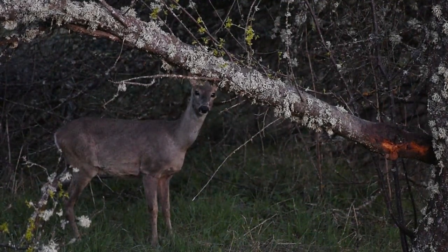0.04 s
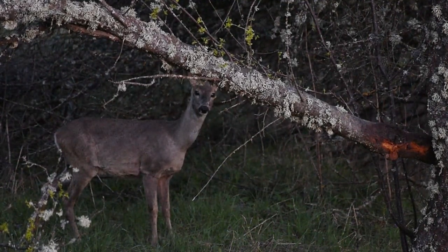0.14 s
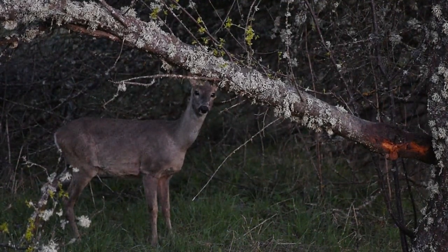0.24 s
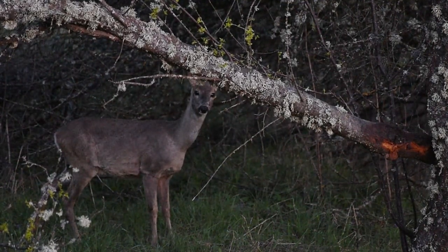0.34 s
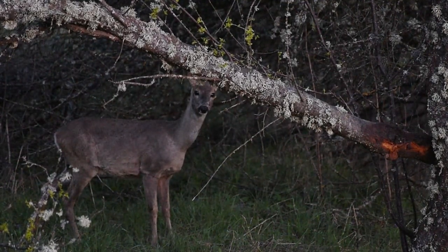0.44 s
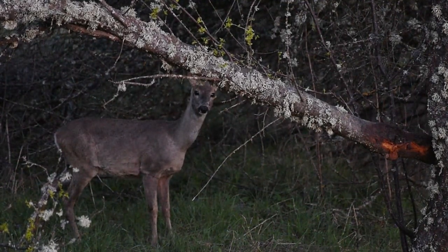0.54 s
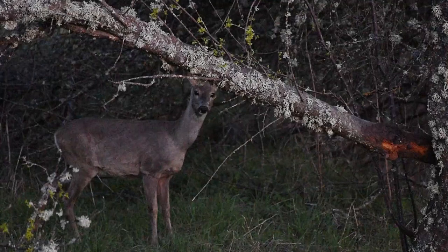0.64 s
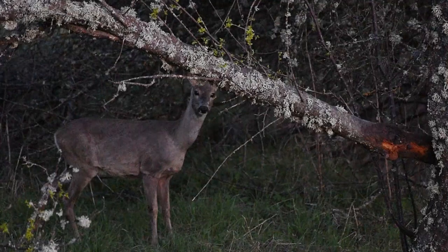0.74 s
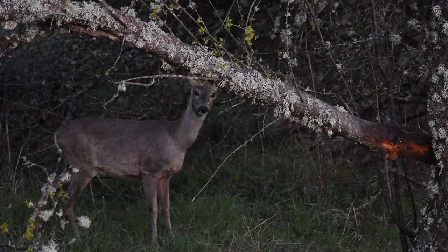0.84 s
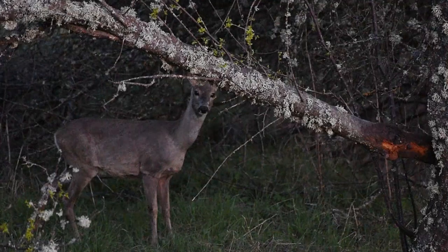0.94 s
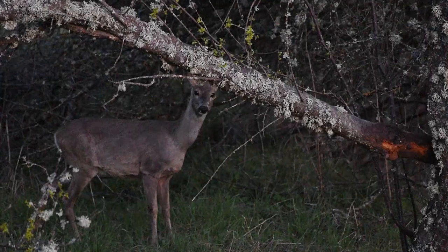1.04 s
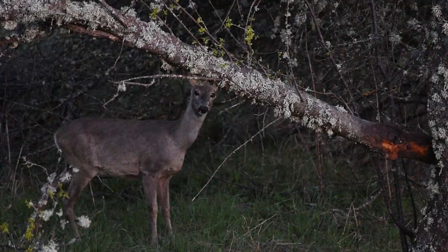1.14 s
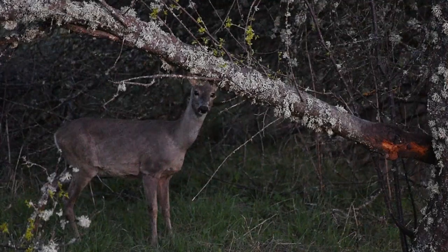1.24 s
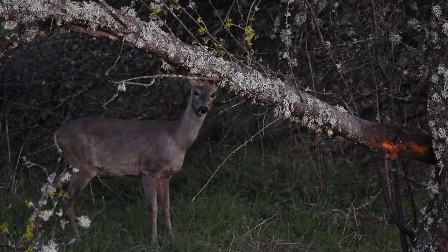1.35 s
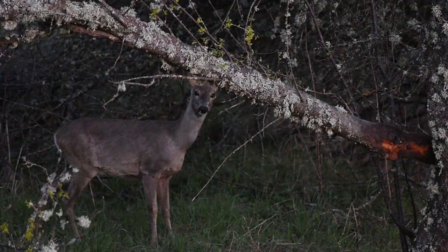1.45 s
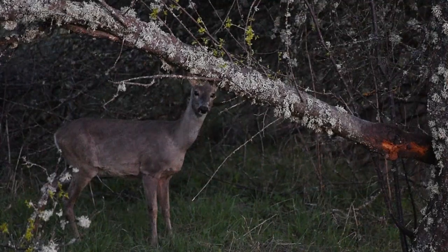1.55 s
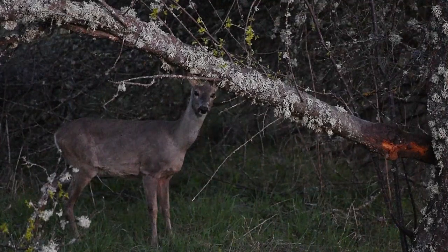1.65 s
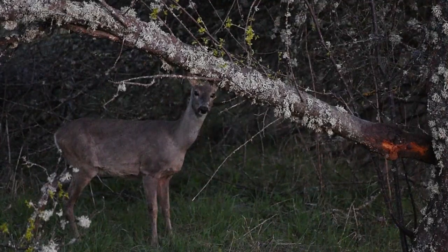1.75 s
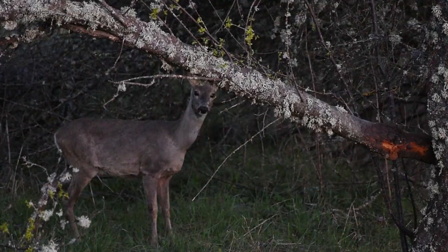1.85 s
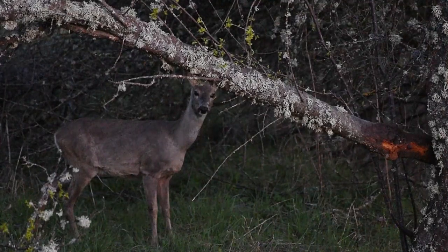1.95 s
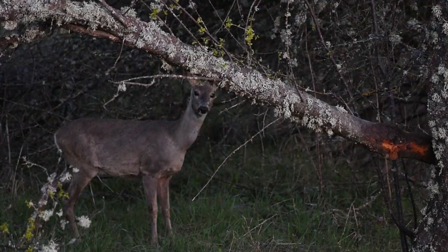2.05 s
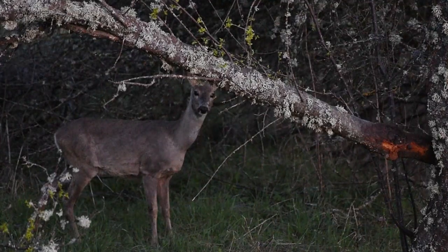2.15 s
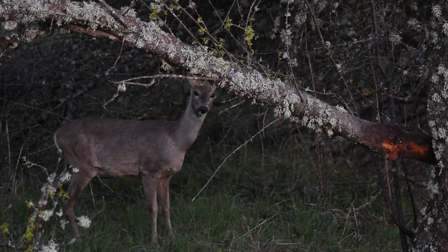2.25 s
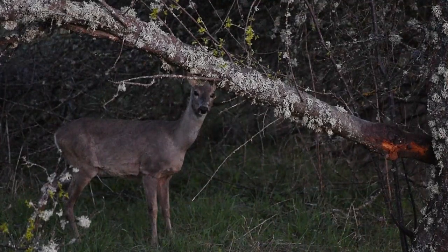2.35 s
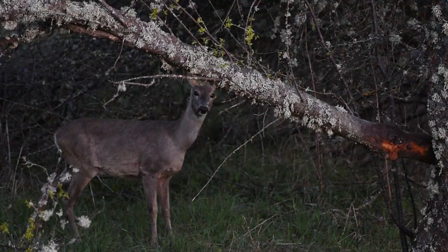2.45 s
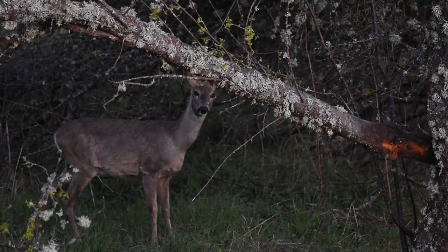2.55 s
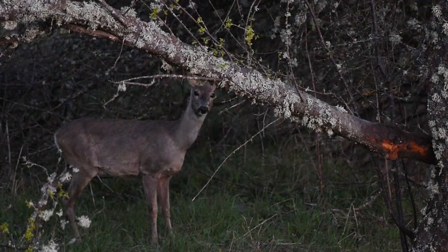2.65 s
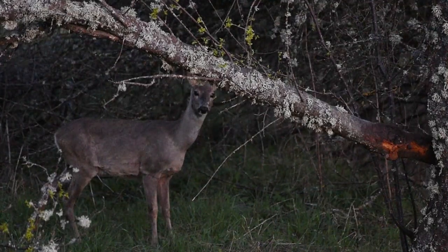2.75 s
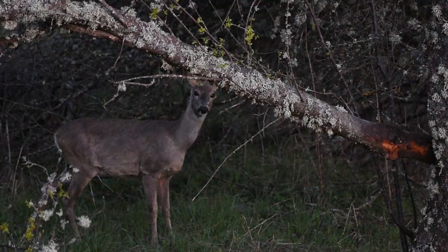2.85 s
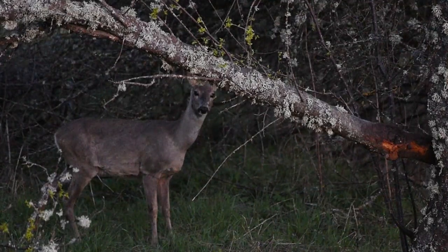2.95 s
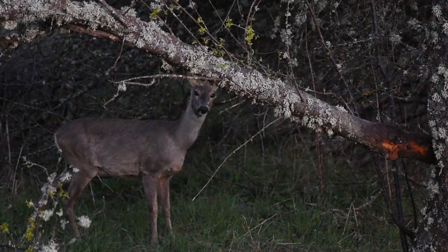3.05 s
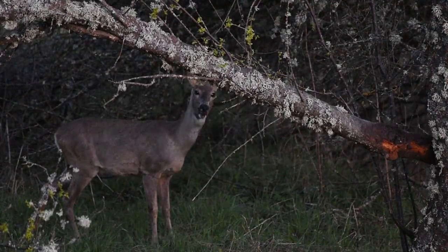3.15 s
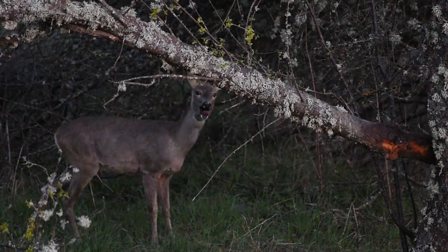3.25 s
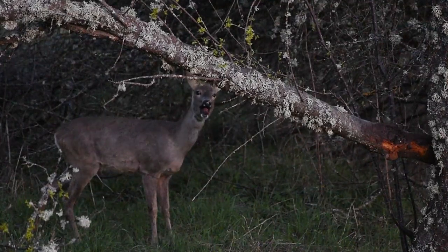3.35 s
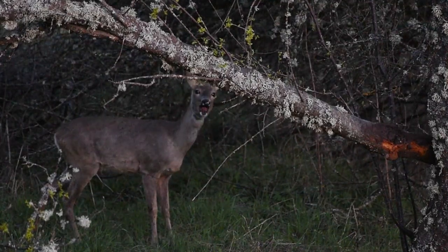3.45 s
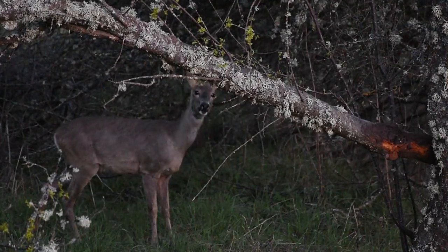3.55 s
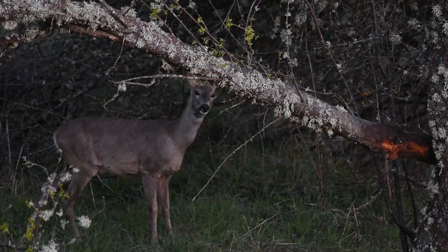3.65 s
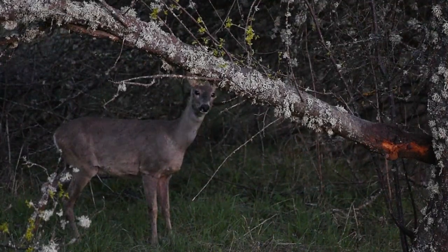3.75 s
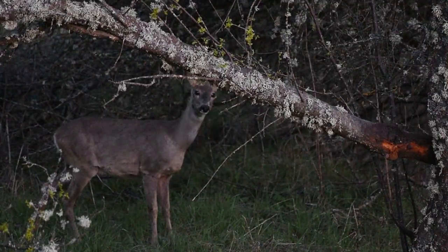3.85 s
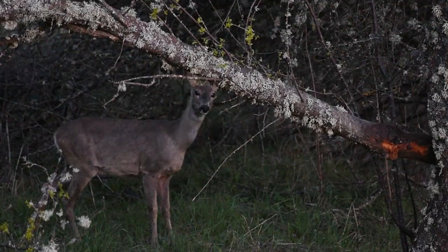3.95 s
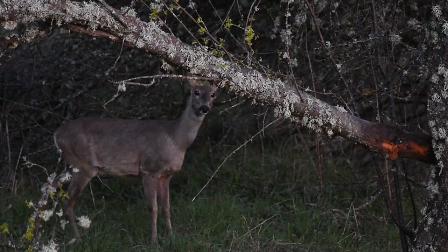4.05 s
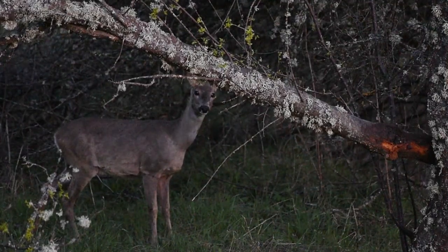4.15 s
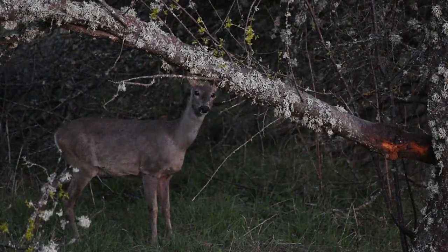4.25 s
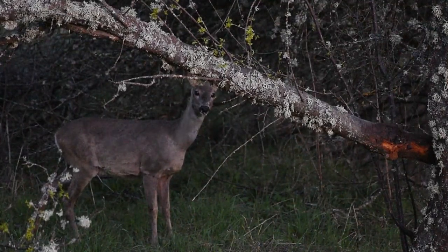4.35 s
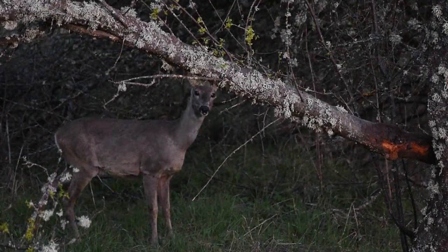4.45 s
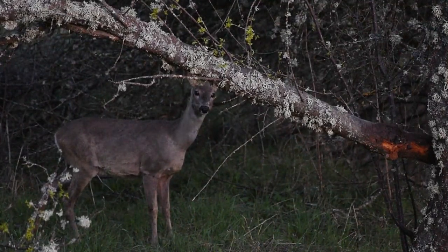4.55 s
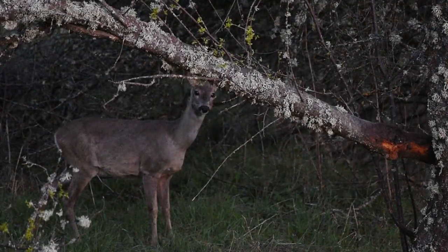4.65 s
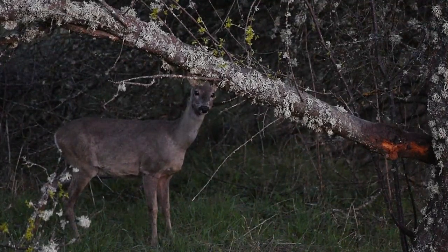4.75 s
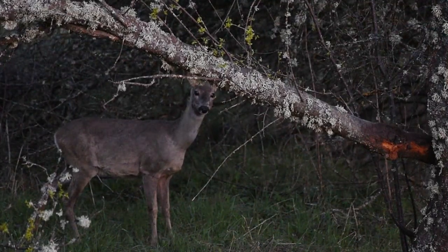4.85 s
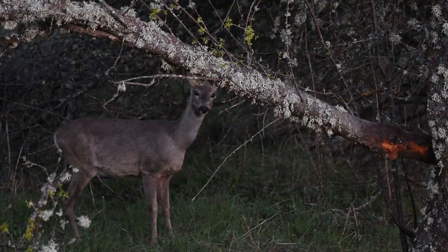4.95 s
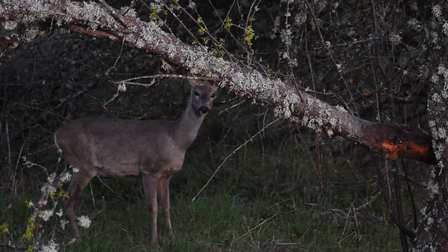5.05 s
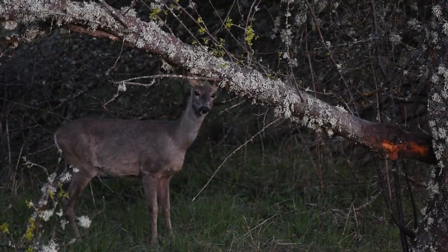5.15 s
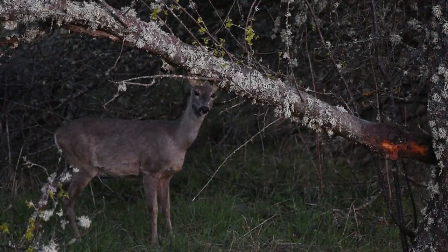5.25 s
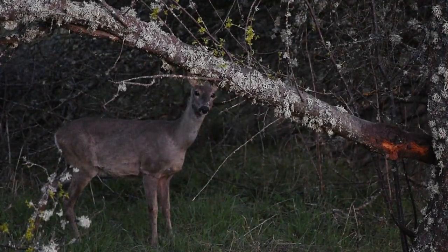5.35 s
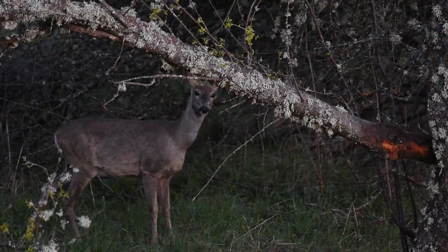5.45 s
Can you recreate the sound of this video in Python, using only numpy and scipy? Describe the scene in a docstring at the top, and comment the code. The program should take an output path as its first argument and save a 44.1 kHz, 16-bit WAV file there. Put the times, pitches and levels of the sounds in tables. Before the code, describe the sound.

In a hushed wood, a songbird whistles a short low fluted phrase while a camera lens motor whirs faintly and soft bumps touch its housing close to the microphone. Fainter bird calls follow. Midway a roe deer gives one loud, hoarse, rasping bark, echoing from the trees for about a second. A brief swish and thin hissing rustle come after, then a distant buzzy chirp and a puff of air.

```python
"""A songbird whistles a short phrase over the quiet hush of a wood: arcs of nearly pure tone, some buzzed.
Close by, a camera's lens motor whirs in short bursts of resonant noise; filtered-noise thuds bump its housing.
Soft noise brushes pass, air puffs swell the rumble, and faint bird calls come from deeper in the wood.
Then a roe deer gives one hoarse bark: rough fold pulses and breath noise drive throat and mouth resonances.
Random echoes from the trees carry it on for about a second; a noise swish and thin hiss rustle after it."""
import sys
import numpy as np
from scipy import signal
from scipy.fft import rfft, irfft
from scipy.io import wavfile
from scipy.ndimage import uniform_filter1d

SR = 44100
rng = np.random.default_rng(int(sys.argv[2]) if len(sys.argv) > 2 else 0)


def inscribe(sig):
    """Save sig as 16-bit PCM at rate SR to the path in sys.argv[1].

    A 1-D sig is mono; a 2-D sig holds one channel per row.
    Samples are clipped to [-1, 1] before scaling.
    """
    pcm = np.round(np.clip(np.atleast_2d(sig).T, -1, 1) * 32767)
    wavfile.write(sys.argv[1], SR, pcm.astype(np.int16))


N = 242991
TIME = np.arange(N) / SR   # seconds


def from_db(db):
    """Decibels to amplitude gain."""
    return 10 ** (np.asarray(db) / 20)


def rms_one(x):
    """Scale to rms 1."""
    return x / np.sqrt(np.mean(x ** 2) + 1e-20)


def in_time(rows):
    """Read each column of a breakpoint curve at every sample."""
    s, *columns = np.transpose(rows)
    return [np.interp(TIME, s, c) for c in columns]


def since(s):
    """Seconds gone by since a moment, 0 before it."""
    return np.maximum(TIME - s, 0)


def during(start, end, fade):
    """Gate of 1 between two moments, with linear ramps inside."""
    return np.clip(np.minimum(TIME - start, end - TIME) / fade, 0, 1)


def hump(s, width):
    """Bell-shaped swell of height 1."""
    return np.exp(-.5 * np.minimum(((TIME - s) / width) ** 2, 100))


def later(x, delay):
    """The same sound, so many seconds on."""
    return np.interp(TIME - delay, TIME, x)


def at_hz(points, hz):
    """Read a curve on a log-frequency axis."""
    points = np.array(points)
    return np.interp(np.log(hz + 1e-3), np.log(points[:, 0]), points[:, 1])


def coloured(x, spectrum):
    """Causal (minimum-phase) filter with the given spectrum, made by folding its cepstrum."""
    size = 8192
    level_db = at_hz(spectrum, np.arange(size // 2 + 1) * SR / size)
    cepstrum = irfft(np.log(from_db(level_db)))
    cepstrum[1:size // 2] *= 2
    cepstrum[size // 2 + 1:] = 0
    impulse = irfft(np.exp(rfft(cepstrum)))
    return signal.oaconvolve(x, impulse)[:N]


def band(x, low_hz, high_hz, order=2):
    """Butterworth band-pass."""
    edges = [low_hz, min(high_hz, .45 * SR)]
    sos = signal.butter(order, edges, "band", fs=SR, output="sos")
    return signal.sosfilt(sos, x + 1e-18)


def resonate(x, hz, width_hz):
    """One two-pole resonance, gain about 1 on top."""
    r = np.exp(-np.pi * width_hz / SR)
    feedback = [1, -2 * r * np.cos(2 * np.pi * hz / SR), r * r]
    return signal.lfilter([(1 - r * r) / 2, 0, (r * r - 1) / 2], feedback, x + 1e-18)


def glide(x, hz, width_hz):
    """Steep moving resonance: shift its centre to 0 Hz, low-pass, shift back."""
    turn = np.exp(2j * np.pi * np.cumsum(hz) / SR)
    sos = signal.butter(2, width_hz / 2, fs=SR, output="sos")
    return 2 * np.real(turn * signal.sosfilt(sos, x / turn))


def drift(rate):
    """Random curve of rms 1, joining this many random points a second."""
    return rms_one(np.interp(TIME * rate, np.arange(8192), rng.standard_normal(8192)))


def evened(x, window_s):
    """Hold the running level near 1 while keeping the single pulses."""
    size = max(int(window_s * SR), 8)
    power = uniform_filter1d(uniform_filter1d(x * x, size), size)
    return x / np.sqrt(np.abs(power) + 1e-12)


# likeness of diffuse noise at the two microphones: (f/Hz, correlation 0-1)
AIR_LIKENESS = [(60, 0), (130, 0.39), (290, .26), (640, 0.26), (1410, 0)]


def stereo_noise(spectrum):
    """Diffuse noise of rms 1: shared and opposed parts set how alike the sides are at each frequency."""
    alike = [(hz, np.clip(c, 0, .95)) for hz, c in AIR_LIKENESS]
    mid = coloured(rng.standard_normal(N), [(hz, 10 * np.log10(1 + c)) for hz, c in alike])
    side = coloured(rng.standard_normal(N), [(hz, 10 * np.log10(1 - c)) for hz, c in alike])
    return rms_one(np.array([coloured(mid + side, spectrum), coloured(mid - side, spectrum)]))


def trees(x, t60, build_s, alike):
    """Scatter from many trunks: random echoes that build up and die away."""
    alike = np.clip(alike, 0, 1)
    shared, *own = rng.standard_normal((3, N))
    noise = np.sqrt(alike) * shared + np.sqrt(1 - alike) * np.array(own)
    echoes = noise * from_db(-60 * TIME / t60) * (1 - np.exp(-TIME / build_s))
    return signal.fftconvolve(x[None], rms_one(echoes) / np.sqrt(N), axes=1)[:, :N]


# hush of the wood, relative spectrum: (f/Hz, level/dB per Hz)
AIR = [(41, -28), (70, -4.5), (92, -9), (123, -1.5), (198, -3), (304, -5), (447, -8), (586, -9),
       (1480, -16), (2030, -15.5), (2270, -17.5), (4900, -20), (8250, -17.5), (15500, -28.5)]
AIR_DB = -54.5
# puffs of air on the microphone: (t/s, level/dB)
PUFFS = [(.08, -69), (1.38, -67), (1.52, -64), (3.85, -68), (4.02, -76), (4.68, -56.5), (4.85, -71)]
PUFF_WIDTH_S, RUMBLE_DB = .06, -67
# colour of the rumble, relative spectrum: (f/Hz, level/dB per Hz)
RUMBLE_COLOUR = [(20, -6.5), (55, 5), (90, -1), (160, -35)]


def still_air():
    """The even hush of the wood, and a faint rumble that swells with each puff of air."""
    rumble = from_db(RUMBLE_DB) + sum(from_db(db) * hump(s, PUFF_WIDTH_S) for s, db in PUFFS)
    return from_db(AIR_DB) * stereo_noise(AIR) + rumble * stereo_noise(RUMBLE_COLOUR)


# how the song reaches the two microphones: (f/Hz, left-right level/dB, left lead/rad)
BIRD_PATH = [(1700, -1, .3), (2030, -5, .05), (2260, -10, 1.84), (2900, -1, 1.1)]
NOTE_RAMP_S = 0.0044
BUZZ_HZ, BUZZ_S, BUZZ_LOSS_DB = 52.6, 0.14, 5   # stutter rate, time to close, loss at full buzz


def whistle(start, length, db, start_hz, middle_hz, end_hz, buzz, swell_db):
    """One almost pure note on an arc of pitch; a buzzed note stutters, then closes to a steady tone."""
    on = (TIME >= start) & (TIME <= start + length)
    age = TIME[on] - start
    depth = np.clip(buzz * (1 - (age / BUZZ_S) ** 2), 0, 1)
    stutter = -depth * np.cos(2 * np.pi * BUZZ_HZ * age)
    arc = np.polyfit([0, .5, 1], [start_hz, middle_hz, end_hz], 2)
    arc_hz = np.polyval(arc, age / length)
    hz = arc_hz * (1 + .02 * stutter + (.005 + .055 * depth) * drift(500)[on])
    # level and phase differ between the microphones
    path_hz, pan_db, lead = np.transpose(BIRD_PATH)
    sides = np.array([[.5], [-.5]])
    pan = sides * np.interp(arc_hz, path_hz, pan_db)
    phase = 2 * np.pi * np.cumsum(hz) / SR + sides * np.interp(arc_hz, path_hz, lead)
    gain = (1 + stutter) * from_db(db + swell_db * (age / length - .5) - BUZZ_LOSS_DB * depth + pan)
    out = np.zeros((2, N))
    out[:, on] = np.sqrt(2) * gain * np.sin(phase)   # root 2 makes the level an rms level
    return out * during(start, start + length, NOTE_RAMP_S)


# song notes, levels before flutter, swell and buzz:
# (start t/s, length t/s, level/dB, start f/Hz, middle f/Hz, end f/Hz, buzz 0-1, swell level/dB)
NOTES = [(.053, 0.059, -51, 2303, 2320, 2060, 0.1, 4.5), (0.146, 0.08, -56, 1650, 1686, 1650, 0, 7),
         (.348, 0.054, -54, 2390, 2410, 2620, 0.15, -7), (0.411, 0.149, -53, 2800, 2842, 2750, .2, -8),
         (.729, 0.15, -47.5, 1960, 2074, 1995, 0.77, 9), (0.904, 0.13, -53, 2490, 2380, 2435, .1, 4.5),
         (1.168, 0.081, -47, 2080, 2067, 1975, 0, 4), (1.267, .122, -52, 2414, 2356, 2354, 0, 1)]
# calls from deep in the wood, same columns:
# (start t/s, length t/s, level/dB, start f/Hz, middle f/Hz, end f/Hz, buzz 0-1, swell level/dB)
FAR_NOTES = [(1.659, 0.18, -69.5, 2100, 2060, 1910, 0.6, 1), (1.969, 0.053, -70, 2240, 2240, 2200, 0.3, 4),
             (2.485, 0.026, -66.5, 2080, 2090, 2070, 0.1, 0), (4.901, 0.051, -61, 2770, 2610, 2680, 0.9, 0),
             (4.959, 0.078, -55.5, 2760, 2615, 2535, 0.98, -5)]


def birds(flutter_db, echo_db, far_echo_db):
    """A fluted phrase nearby and faint calls further off, scattered by the trees."""
    song = from_db(flutter_db * drift(46.15)) * sum(whistle(*note) for note in NOTES)
    far = sum(whistle(*note) for note in FAR_NOTES)
    scattered = from_db(echo_db) * coloured(song.mean(axis=0), [(2050, -1.0), (2400, 3.0), (2800, 6)])
    scattered = scattered + from_db(far_echo_db) * far.mean(axis=0)
    return song + far + trees(scattered, t60=0.7, build_s=0.0027, alike=0.11)


# lens motor runs: (start t/s, end t/s, level/dB)
FOCUS = [(.345, .508, -59.5), (0.835, 1.008, -59.5), (1.833, 2.004, -58.5), (2.328, 2.52, -59.5),
         (4.819, 5.076, -59)]
# resonances of the motor: (f/Hz, width f/Hz, relative level/dB)
MOTOR = [(5600, 400, -10), (8900, 800, -4), (10050, 400, 0), (10750, 400, -6), (11450, 500, -1.5),
         (12200, 450, -4.5), (14500, 500, -15)]
# bumps on the housing: (t/s, peak level/dB, decay t/s, low edge f/Hz, top edge f/Hz)
BUMPS = [(.083, -42, .0052, 92, 237), (.198, -43.5, 0.0065, 129, 296), (0.201, -44.5, 0.0083, 590, 1100),
         (1.402, -48, 0.03, 260, 390), (1.908, -43, 0.026, 153, 345)]


def camera():
    """The lens motor hisses in its resonances; bumps are decaying noise in narrow, mostly low bands."""
    running = sum(from_db(db) * during(start, end, .0044) for start, end, db in FOCUS)
    steps = 1 + .27 * np.sin(2 * np.pi * 60 * TIME)   # the motor moves in quick steps
    friction = steps * rng.standard_normal((2, N))
    whir = rms_one(sum(from_db(db) * resonate(friction, hz, width) for hz, width, db in MOTOR))
    out = running * whir
    for s, db, decay, low_hz, top_hz in BUMPS:
        knock = rng.standard_normal(N) * (TIME >= s) * np.exp(-np.minimum(since(s) / decay, 40))
        thud = band(knock, low_hz, top_hz)
        out = out + from_db(db) * thud / np.abs(thud).max()
    return out


# brief soft brushing sounds: (t/s, level/dB, width t/s, centre f/Hz)
BRUSHES = [(.27, -54, .013, 5800), (2.295, -56.5, 0.0099, 1890), (2.505, -68, .01, 1900),
           (2.77, -60, 0.0078, 1890)]
# colour of the rustle, relative spectrum: (f/Hz, level/dB per Hz)
RUSTLE_COLOUR = [(1500, -0.5), (2500, -3.5), (4500, -2.5), (7000, -2.5), (9000, 2), (11500, -8),
                 (15500, -20)]
SWISH_S, SWISH_WIDTH_S, SWISH_DB = 3.9, 0.042, -50.5
HISS_START_S, HISS_END_S, HISS_RAMP_S, HISS_DB = 3.72, 5.17, 0.096, -57


def rustles(waver_db):
    """Bell-shaped noise brushes, then a swish over a thin wavering hiss that holds on after it."""
    hiss = from_db(HISS_DB + waver_db * drift(20)) * during(HISS_START_S, HISS_END_S, HISS_RAMP_S)
    swish = from_db(SWISH_DB) * hump(SWISH_S, SWISH_WIDTH_S)
    out = (hiss + swish) * stereo_noise(RUSTLE_COLOUR)
    grain = rng.standard_normal((2, N))
    for s, db, width, hz in BRUSHES:
        out = out + from_db(db) * hump(s, width) * rms_one(band(grain, hz / 2, hz * 2))
    return out


LURCH = 0.58   # depth of the strong-weak beat of the folds at full roughness (0-1)


def lurch(cycles, rough, count=3):
    """Strained folds beat strongly every third cycle, which adds undertones."""
    return 1 + LURCH * rough * np.cos(2 * np.pi * cycles / count)


# hard pushes, each a slap of the folds and a brief surge that each layer takes a share of:
# (t/s, surge level/dB, slap level/dB)
PUSHES = [(3.29, 5.5, -7.5), (3.3322, 4.5, -1), (3.372, 3, 4.5), (3.4003, 4.5, 4), (3.452, 3, -3),
          (3.5113, 2, 13), (3.5228, 4, 11), (3.5504, 7, -2.5)]


def folds(pitch, rough, jitter, shimmer_db, breath):
    """Vocal folds flap unevenly; each opening lets through a puff of turbulent air."""
    cycles = np.cumsum(pitch * np.exp(jitter * rough * drift(170))) / SR
    shimmer = from_db(shimmer_db * rough * np.clip(drift(140), -1, 1))
    pulses = np.diff(np.floor(cycles), prepend=0) * shimmer
    pulses = pulses * lurch(cycles, rough)
    # a slap replaces the ordinary pulses around it
    for s, _, slap_db in PUSHES:
        pulses *= 1 - during(s - .003, s + .003, .001)
        pulses[round(s * SR)] = from_db(slap_db)
    puffs = .18 + signal.lfilter([1], [1, -np.exp(-1 / (.0028 * SR))], pulses + 1e-18)
    turbulence = rms_one(puffs * rng.standard_normal(N))
    return -pulses + breath * rough * turbulence * np.sqrt(pitch / SR)


# the bark swells, holds, fades as the air runs out, and is released
BARK_START_S, BARK_FADE_S, BARK_END_S = 3.26, 3.5194, 3.66
ONSET_DB, RELEASE_DB_PER_S = 43, 210   # depth the attack rises from, extra fall after the end
SURGE_S = 0.0064   # time to the peak of a surge


def effort(level_db, attack_s, fade_db_per_s, surge_share):
    """Gain of one layer of the bark: attack, hold with surges, fade, release."""
    surges = sum(db * since(s) / SURGE_S * np.exp(1 - since(s) / SURGE_S) for s, db, _ in PUSHES)
    attack = ONSET_DB * np.exp(-since(BARK_START_S) / attack_s)
    fall = fade_db_per_s * since(BARK_FADE_S) + RELEASE_DB_PER_S * since(BARK_END_S)
    return (TIME > BARK_START_S) * from_db(level_db + surge_share * surges - attack - fall)


# larynx: (t/s, pitch f/Hz, roughness 0-1, lowest throat resonance f/Hz)
LARYNX = [(3.26, 181.4, 0.82, 666), (3.33, 178.2, 0.88, 760), (3.41, 177.6, .94, 776),
          (3.47, 176.3, 0.92, 713), (3.555, 173, .8, 738), (3.605, 158.3, 0.65, 655),
          (3.68, 155.3, 0.19, 590)]
# steady resonances beside the moving one, each passed twice at double this width:
# (f/Hz, width f/Hz, relative level/dB)
THROAT = [(535, 11, -6.5), (625, 30, -13), (730, 24, -2), (805, 18, -4)]
# resonances of the mouth, relative spectrum: (f/Hz, level/dB per Hz)
MOUTH = [(680, -24.5), (1120, -4.5), (1300, -7), (1400, 1), (1620, -1.5), (1800, -5.5), (1930, 1),
         (2090, -8.5), (2330, -15), (2460, -6.5), (2900, -8.5), (3040, -17), (3400, -17), (3800, -27),
         (4080, -26), (4600, -33.5), (5980, -90)]
# rasp of the rushing air, relative spectrum: (f/Hz, level/dB per Hz)
RASP = [(2470, -31), (4200, 2), (4600, -8), (5310, -2.5), (5660, -8), (6530, -7), (7120, -2), (7510, -4.5),
        (7870, -18.5), (9090, -5), (11700, -18.5), (15000, -43)]
# the bark ends on a clear note, its fourth harmonic
CLEAR_START_S, CLEAR_LENGTH_S, CLEAR_HZ, CLEAR_DB = 3.597, 0.077, 625.3, -18.5


def deer():
    """Folds drive throat and mouth; higher layers open later, the low resonance sinks as the mouth closes."""
    pitch, rough, throat_hz = in_time(LARYNX)
    source = folds(pitch, np.clip(rough, 0, 1), jitter=.11, shimmer_db=2.5, breath=1.76)
    low = glide(source, throat_hz, width_hz=115) + from_db(-24) * band(source, 480, 900, order=3)
    for hz, width, db in THROAT:
        low = low + from_db(db) * resonate(resonate(source, hz, 2 * width), hz, 2 * width)
    low = evened(band(low, 321, 896, order=6), 0.012)   # a deep valley lies above the low resonance
    throat = band(low, 330, 2700, order=4)
    throat = throat * effort(level_db=-19, attack_s=0.02, fade_db_per_s=83, surge_share=0.87)
    # at the end the folds settle and one harmonic rings clear
    settled = np.sin(np.pi * np.minimum(since(CLEAR_START_S) / CLEAR_LENGTH_S, 1))
    note = from_db(CLEAR_DB) * settled * np.sin(2 * np.pi * CLEAR_HZ * TIME)
    # the fundamental hums faintly through the neck
    cycles = np.cumsum(pitch * (1 + 0.053 * drift(120))) / SR
    neck = lurch(cycles, rough) * np.sin(2 * np.pi * cycles)
    neck = neck * effort(level_db=-51.5, attack_s=0.0093, fade_db_per_s=8, surge_share=0.23)
    mouth = evened(band(coloured(source, MOUTH), 740, 7500, order=4), 0.018)
    mouth = mouth * effort(level_db=-21.5, attack_s=.028, fade_db_per_s=107.5, surge_share=0.64)
    rasp = evened(coloured(source, RASP), 0.0097)
    rasp = rasp * effort(level_db=-46.0, attack_s=0.034, fade_db_per_s=149, surge_share=0.99)
    return throat + note + neck, mouth + rasp


# how the bark reaches the two microphones: (f/Hz, left-right level/dB)
BARK_SIDE = [(110, 1), (380, -2), (700, 1.8), (1290, -3), (2380, -5.5), (4400, 4), (8120, -2), (15000, 16)]
TRUNK_ECHO_S, TRUNK_ECHO_DB = 0.1, -28
# what the nearest trees send back, before the scatter level: (f/Hz, level/dB)
NEAR_WOOD = [(450, 3), (650, -1.5), (1100, 7.5), (2000, -2), (4000, 1)]
# what the distant trees send back, before the scatter level: (f/Hz, level/dB)
FAR_WOOD = [(200, -21.5), (500, -2.5), (620, -3), (760, 2.5), (1000, 9.5), (1300, 9), (1520, 5),
            (1850, -5.5), (3000, -3.5), (8000, -5)]
# single echoes from the edges of the clearing, before the scatter level: (delay t/s, level/dB)
FAR_ECHOES = [(.45, -7), (.68, -6), (.92, -11.5)]


def bark():
    """Nearby twigs scatter mainly treble to the sides; a trunk answers, the wood behind late and dull."""
    low, high = deer()
    voice = low + high
    twigs = trees(from_db(-8) * high + from_db(-17) * low, t60=.04, build_s=.0015, alike=1)[0]
    close = np.array([coloured(voice + side * twigs, [(hz, side * db / 2) for hz, db in BARK_SIDE])
                      for side in (1, -1)])   # left, right
    undergrowth = from_db(-7) * trees(high, t60=.09, build_s=.003, alike=.7)
    trunk = from_db(TRUNK_ECHO_DB) * later(voice, TRUNK_ECHO_S)
    near = from_db(-15.5) * trees(coloured(voice, NEAR_WOOD), t60=0.36, build_s=0.013, alike=0.58)
    distant = coloured(voice, FAR_WOOD)
    far = from_db(-33.0) * trees(distant, t60=3.6, build_s=0.061, alike=0.62)
    returns = sum(from_db(db) * later(distant, delay) for delay, db in FAR_ECHOES)
    edges = from_db(-38.5) * trees(returns, t60=.6, build_s=.02, alike=.6)
    return close + undergrowth + trunk + near + far + edges


def scene():
    """Everything as it reaches the two microphones."""
    song = birds(flutter_db=0.86, echo_db=-9.0, far_echo_db=1)
    return still_air() + song + camera() + rustles(waver_db=1.4) + bark()


CUTOFF_HZ = 15700


def record(dry):
    """A steep elliptic low-pass cuts the top."""
    sos = signal.ellip(12, .1, 80, CUTOFF_HZ, fs=SR, output="sos")   # 0.1 dB ripple, 80 dB stop
    return signal.sosfilt(sos, dry)


dry = scene()
out = record(dry)
inscribe(out)
```